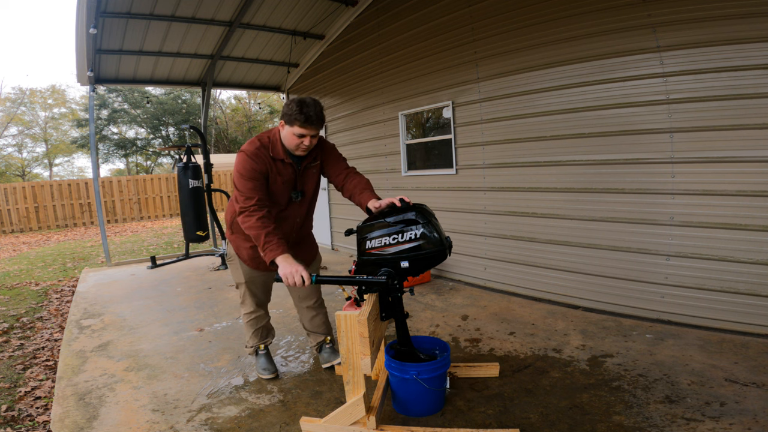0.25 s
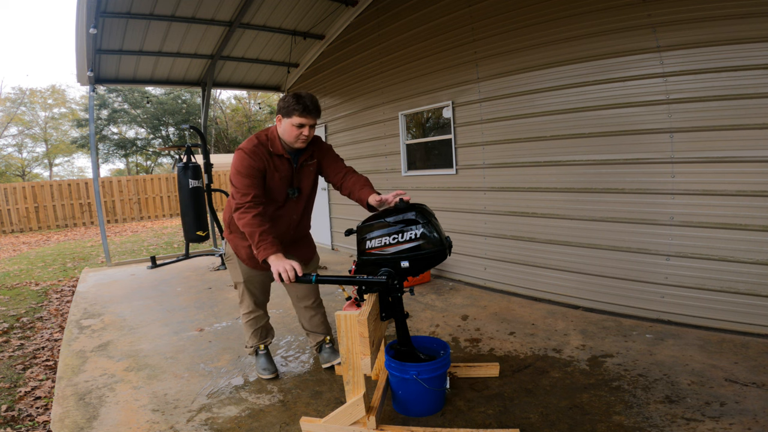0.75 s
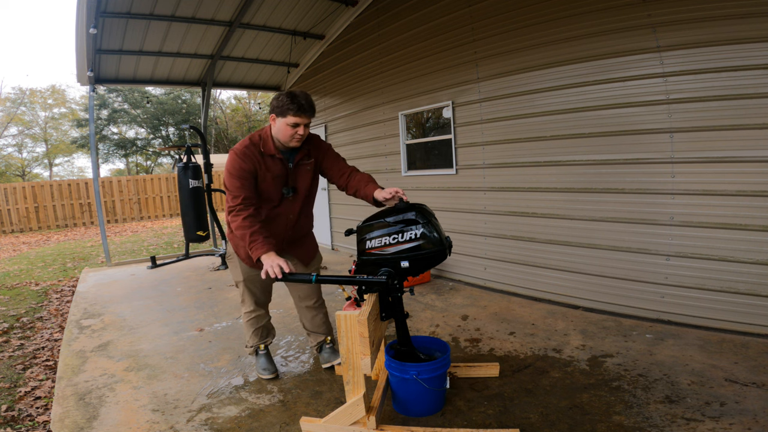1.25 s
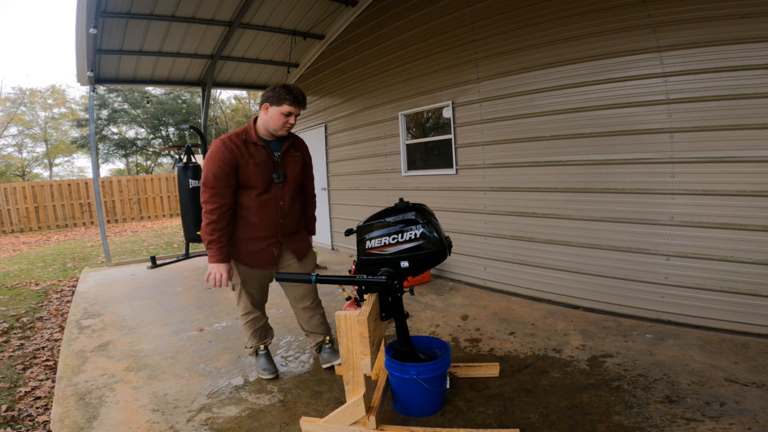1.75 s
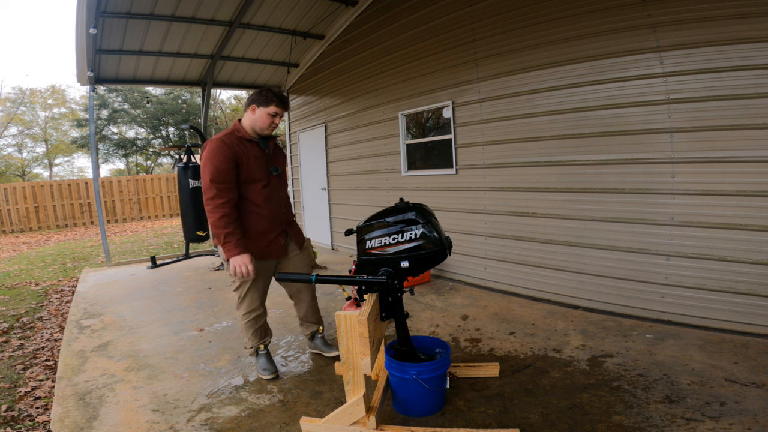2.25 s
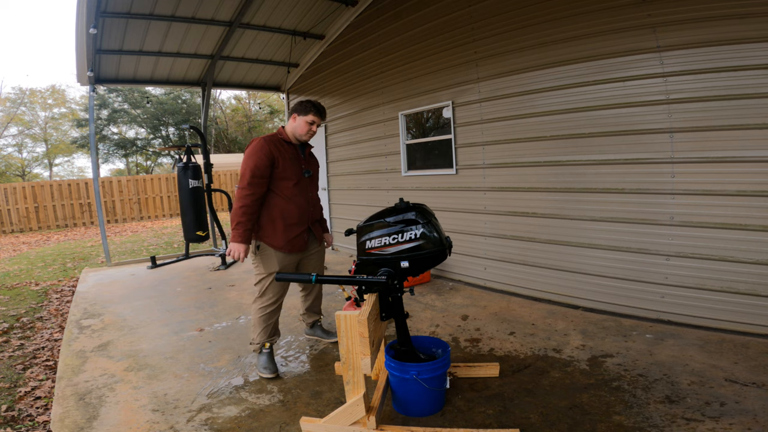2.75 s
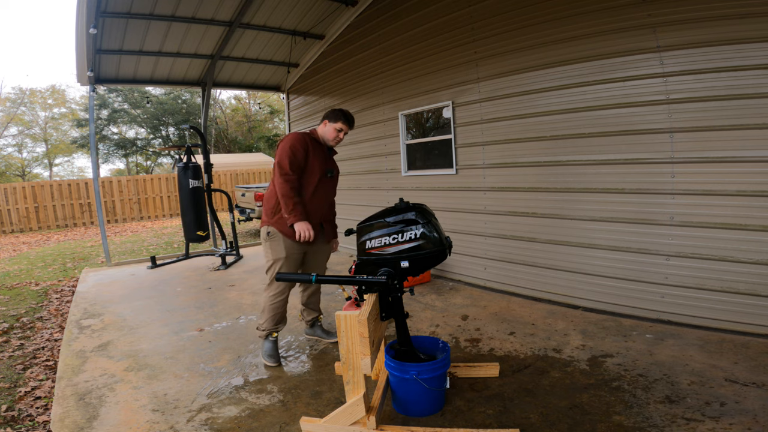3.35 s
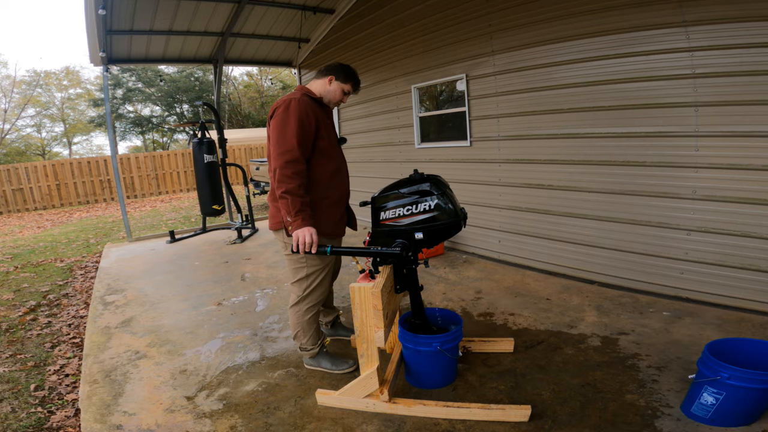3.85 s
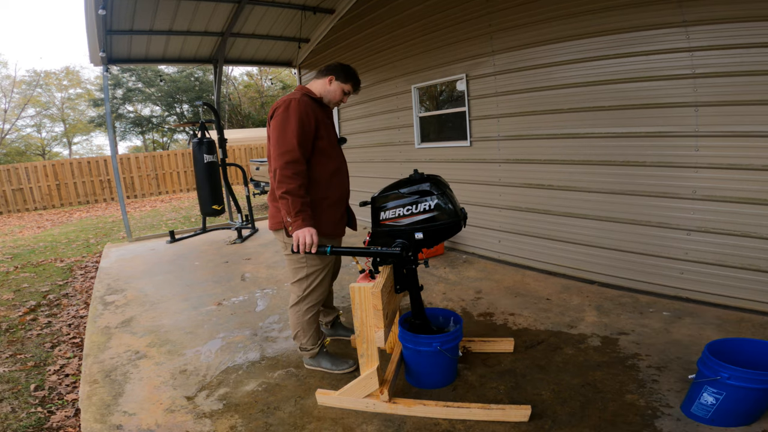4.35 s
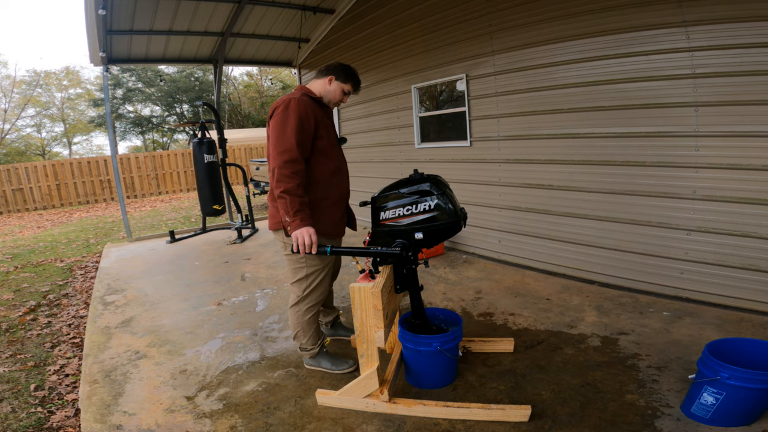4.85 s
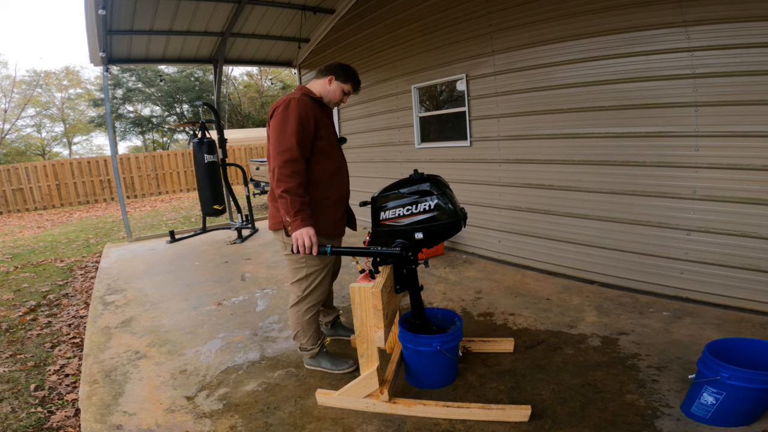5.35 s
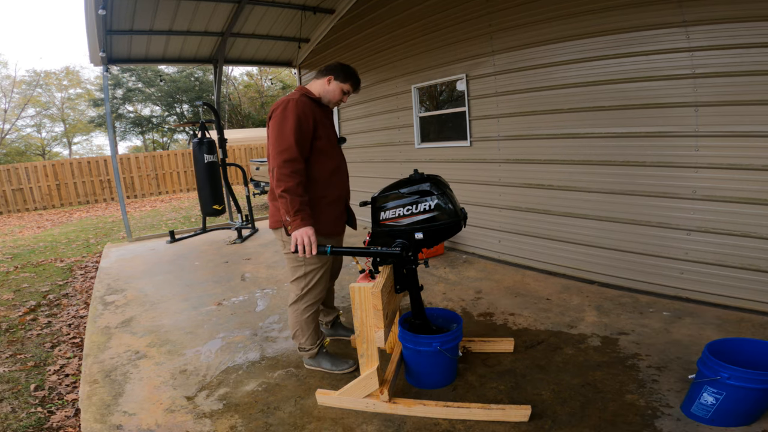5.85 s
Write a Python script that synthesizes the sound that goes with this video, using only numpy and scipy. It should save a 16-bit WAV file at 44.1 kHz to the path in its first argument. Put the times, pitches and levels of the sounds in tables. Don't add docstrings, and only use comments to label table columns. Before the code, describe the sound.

From 0 s a small outboard engine is already idling, its leg in a bucket of water under a carport. About eight or nine puffs a second, slightly uneven, each give a short low thump, a hollow wet burble and knocks that ring the bucket, with a light dry valve click on the engine cover. Large bubbles pop irregularly; a faint bracket hum grows around 1.3 s and fades by 1.6 s. From about 1.5 to 2 s fine spray begins to hiss, and from 3 to 3.9 s watery spits become sharp and frequent. At 3.9 s a hard cut: the right channel drops to almost nothing and the left carries a slightly faster idle, around nine to ten puffs a second, with weaker bucket knocks, more metallic ticking, simmering water and fan whine. Deep gulps cluster at 3.95-4.4 s, another near 4.95 s. Spray gradually thins and thumps soften until the end near 6.1 s, engine still running. Close microphone, short dull echoes.

```python
import sys
import numpy as np
from scipy import signal
from scipy.fft import rfft, irfft
from scipy.io import wavfile
from scipy.ndimage import uniform_filter1d

SR = 44100
rng = np.random.default_rng(int(sys.argv[2]) if len(sys.argv) > 2 else 0)


def master(y):
    cut = np.clip(np.atleast_2d(y).T, -1, 1)
    pcm = np.round(cut * 32767)
    wavfile.write(sys.argv[1], SR, pcm.astype(np.int16))


def invert_db(level):
    return 10 ** (np.asarray(level, dtype=float) / 20)


N = 269890
CUT_S = 3.9043


def by_idle(first, second):
    return np.where(np.arange(N) < CUT_S * SR, first, second)


def rms_one(x):
    return x / np.sqrt(np.mean(x ** 2) + 1e-20)


def add(track, s, piece):
    i = round(s * SR)
    piece = piece[max(-i, 0):max(N - i, 0)]
    track[max(i, 0):max(i, 0) + len(piece)] += piece


def band_pass(x, low_hz, high_hz):
    return signal.sosfilt(signal.butter(2, [low_hz, high_hz], "band", fs=SR, output="sos"), x)


def resonate(x, hz, width_hz):
    r = np.exp(-np.pi * width_hz / SR)
    top = (1 - r * r) / 2 * np.array([1, 0, -1])
    return signal.lfilter(top, [1, -2 * r * np.cos(2 * np.pi * hz / SR), r * r], x)


def resonate_twice(x, hz, width_hz):
    return resonate(resonate(x, hz, width_hz), hz, width_hz)


def body(x, idles):
    both = []
    for modes in idles:
        rings = [invert_db(db) * (-1) ** k * resonate(x, hz, width) for k, (hz, width, db) in enumerate(modes)]
        both.append(sum(rings))
    return by_idle(*both)


def swell(rise_ms, fall_ms):
    t_ms = np.arange(int(.12 * SR)) / SR * 1000
    shape = (1 - np.exp(-t_ms / rise_ms)) * np.exp(-t_ms / fall_ms)
    return shape / shape.max()


def grit(per_s, spread_db):
    sizes = invert_db(spread_db * np.minimum(rng.exponential(1, N), 4)) * rng.choice([-1, 1], N)
    return rms_one(sizes * (rng.random(N) < per_s / SR) + 1e-9)


def clumps(per_s, depth_db):
    knots = rng.standard_normal(int(N / SR * 60))
    return invert_db(depth_db * np.interp(np.arange(N) / SR * per_s, np.arange(len(knots)), knots))


def bubble(hz, cycles, rise):
    t = np.arange(int(.05 * SR)) / SR
    tone = np.sin(2 * np.pi * hz * (t + rise * t * t * hz / cycles))
    return tone * np.exp(-t * hz / cycles) * (1 - np.exp(-t * hz / 2.02))


def effort(cycles, rise_ms, fall_ms):
    flow = np.zeros(N)
    for s, _, lead_ms, db, _ in cycles:
        add(flow, s - lead_ms / 1000, invert_db(db) * swell(rise_ms, fall_ms))
    return flow


def carport(x):
    echoes = np.zeros(int(.06 * SR))
    delays_s = np.array([.007, .013, .021, .034, .047])
    echoes[(SR * delays_s).astype(int)] = invert_db(np.array([-20.0, -18, -10.5, -23.5, -65]))
    return x + signal.lfilter([.4], [1, -.6], signal.fftconvolve(x, echoes)[:N])


# t/s, level/dB
BRACKET_HUM = [
    (0, -59),
    (.6, -53.5),
    (1.3, -50),
    (1.6, -66.5),
    (6.12, -57),
]


def bracket():
    s, db = np.transpose(BRACKET_HUM)
    tone = resonate_twice(rng.standard_normal(N), 2078, 47)
    return invert_db(np.interp(np.arange(N) / SR, s, db)) * rms_one(tone)


DROPS_PER_S, DROP_DB = 45, [-27, -27]
DROP_LOW_HZ, DROP_HIGH_HZ = 1300, 15000


def drops():
    out = np.zeros(N)
    draws = rng.random((int(DROPS_PER_S * N / SR), 3))
    noises = rng.standard_normal((len(draws), int(.12 * SR)))
    for (when, size, pitch), noise in zip(draws, noises):
        hz = min(DROP_LOW_HZ * (DROP_HIGH_HZ / DROP_LOW_HZ) ** pitch, .45 * SR)
        hiss = resonate_twice(noise * swell(0.6, 6.0), hz, .25 * hz)
        add(out, when * N / SR, invert_db(-12.0 * size - 14.0 * pitch) * hiss)
    return by_idle(*invert_db(DROP_DB)) * out


# t/s, level/dB
MIST_LEVEL = [
    (0, -71),
    (1.5, -39),
    (2, -19),
    (2.5, -20.5),
    (3.201, -17),
    (3.9, -10.5),
    (3.91, -9.5),
    (6.12, -23),
]


def mist(cycles):
    s, db = np.transpose(MIST_LEVEL)
    patches = np.zeros(N)
    for hz, band_db in [(4600, 5.5), (7000, -2.5), (10000, 1.5), (14000, -9.0)]:
        hiss = rms_one(resonate(grit(per_s=4300, spread_db=10.0), hz, 0.32 * hz))
        patches += clumps(45, 2.9) * hiss * invert_db(band_db)
    return invert_db(np.interp(np.arange(N) / SR, s, db) - 6.5) * effort(cycles, 4.5, 35) * patches


WHINE_ORDER, WHINE_DB = 96.5, [-46, -39.5]


def whine(cycles):
    times = cycles[:, 0]
    speed = np.interp(np.arange(N) / SR, times[1:] - .05, 1 / np.diff(times))
    phase = 2 * np.pi * np.cumsum(WHINE_ORDER * uniform_filter1d(speed, size=9000)) / SR
    blur = np.exp(-2 * np.pi * 20 / SR)
    a, b = signal.lfilter([1], [1, -blur], rng.standard_normal((2, N)))
    tone = rms_one(a * np.sin(phase) + b * np.cos(phase))
    pulse = 0.54 + 0.63 * rms_one(effort(cycles, 5.6, 22))
    return by_idle(*invert_db(WHINE_DB)) * tone * pulse * clumps(11, 2.5)


# f/Hz, level/dB (per Hz)
CHURN_COLOUR = [
    [(30, -46), (150, -19), (300, -21.5), (650, -23.5), (1200, -28.5), (2300, -31.5), (4200, -42),
     (8200, -46.5), (15900, -51.5)],
    [(30, -29.5), (140, -19.5), (350, -11.5), (600, -40), (1300, -27.5), (2800, -27), (4200, -39.5),
     (9200, -43), (15900, -50)],
]
CHURN_DB = [-42, -39.5]


def churn(cycles):
    white, hz = rfft(rng.standard_normal(N)), np.linspace(1, SR / 2, N // 2 + 1)
    both = []
    for colour, level_db in zip(CHURN_COLOUR, CHURN_DB):
        at_hz, db = np.transpose(colour)
        shape = invert_db(np.interp(np.log(hz), np.log(at_hz), db, left=-70))
        both.append(invert_db(level_db) * rms_one(irfft(white * shape, N)))
    noise, flow = by_idle(*both), rms_one(effort(cycles, 9.8, 12))
    edges_hz = [20, 1200, 3500, 6500, 12800, 18000]
    signs = [1, -1, 1, -1, .75]
    patchy_db, flow_share = [.8, 1.2, 1.3, 1.6, 1.8], [0.67, 0.22, 0.35, 0.4, 0.3]
    out = np.zeros(N)
    for low, high, sign, depth_db, share in zip(edges_hz, edges_hz[1:], signs, patchy_db, flow_share):
        out += sign * band_pass(noise, low, high) * clumps(58, depth_db) * (1 + share * flow)
    return out


# t/s, level/dB (peak)
WALL_RING = [
    (1.3, -56),
    (1.7, -33.5),
    (2.7, -33),
    (3, -47),
    (3.85, -40),
]


def bucket_wall(cycles):
    s, db = np.transpose(WALL_RING)
    out, t = np.zeros(N), np.arange(int(.12 * SR)) / SR
    ring = swell(18, 36) * np.sin(2 * np.pi * 583 * t)
    for (at, *_), size in zip(cycles, rng.standard_normal(len(cycles))):
        add(out, at - .012, invert_db(np.interp(at, s, db, left=-70, right=-70) + 2 * size) * ring)
    return out


# t/s, level/dB, f/Hz
DEEP_GULPS = [
    (3.954, -21, 408),
    (4.045, -18, 414),
    (4.139, -21, 413),
    (4.229, -23.5, 428),
    (4.405, -27.5, 392),
    (4.945, -24.5, 370),
]


def gurgle(cycles):
    out = np.zeros(N)
    for (s, *_), (late, size, pitch) in zip(cycles, rng.random((len(cycles), 3))):
        add(out, s - .015 + 0.044 * late, invert_db(-27.5 - 5.9 * size) * bubble(300 + 160 * pitch, 3.05, 0.03))
    for s, db, hz in DEEP_GULPS:
        add(out, s, invert_db(db) * bubble(hz, 6.0, 0.0088))
    push = rms_one(band_pass(rng.standard_normal(N), 45, 150))
    return out + invert_db(-19.0) * push * effort(cycles, 16, 24) * clumps(12.0, 0.65)


# f/Hz, width/Hz, level/dB
BUCKET_RINGS = [
    [(337.6, 42, -1), (432, 37, 2.5), (574, 25.6, -1), (758, 52, 3), (850, 60, 3), (1000, 89, -1.5),
     (1270, 580, -12.5)],
    [(362, 62, -8), (486, 290, -9), (682, 105, -6.5), (903, 60, -3.5), (1100, 200, -13.5), (1390, 21, -22)],
]
KNOCK_DB, KNOCK_LAG_MS = [9.5, -10], [8.02, 17]


def knocks(cycles):
    out, luck = np.zeros(N), rng.standard_normal((len(cycles), 2, 8))
    for (s, _, lead_ms, db, _), blows in zip(cycles, luck):
        idle = int(s > CUT_S)
        for lag_ms, sizes in zip(KNOCK_LAG_MS, blows):
            for (hz, width, mode_db), size in zip(BUCKET_RINGS[idle], sizes):
                gain = invert_db(db + mode_db + KNOCK_DB[idle] - 17.5 + 2.8 * size)
                add(out, s + (lag_ms - lead_ms) / 1000, gain * bubble(hz, min(0.42 * hz / width, 9), 0))
    return out


def spray(spits):
    gate, out = np.zeros(N), np.zeros(N)
    for (s, db, hz), draws in zip(spits, rng.random((len(spits), 5, 3))):
        add(gate, s - .012, invert_db(db) * np.hanning(int(0.019 * SR)))
        for k, (late, size, pitch) in enumerate(draws - .5):
            gain = invert_db(db - 4 - 5.0 * abs(k - 2) + 0.81 * size)
            small = bubble(hz * (.74 + 0.075 * k + .15 * pitch), 7.2, 0.0377)
            add(out, s - .008 + 0.0042 * (k + late), gain * small)
    droplets = band_pass(grit(per_s=9000, spread_db=-4.0), 1200, 3800)
    return out + invert_db(-16.5) * gate * rms_one(droplets)


# f/Hz, width/Hz, level/dB
COVER_RINGS = [
    [(936, 195, 7), (2020, 11, -6), (2620, 240, 5), (3370, 68, 3.5), (5050, 180, -1), (5700, 3600, -8),
     (8100, 1530, -2.5), (10600, 2000, -14), (14400, 2500, -18)],
    [(950, 104, 11), (2140, 41, 10.5), (2440, 540, 6.5), (3090, 710, 3.5), (4560, 130, 3.5),
     (5670, 300, -1.5), (9200, 1360, -6.5), (14500, 2100, -16)],
]
# share of the cycle, level/dB under the click (first idle, second idle), f/Hz
GEAR_TAPS = [
    (0.037, -13, -7, 5230),
    (.19, -44, -10, 5700),
    (0.311, -21, -8, 4480),
    (0.551, -9.5, -17.5, 2720),
    (0.802, -19, -16, 5700),
]
# f/Hz, cycles of ring, level/dB over the click
ROCKER_RING = [
    (2660, 9.6, 0),
    (2850, 4.9, 6),
]
# t/s, level/dB (peak), f/Hz
STRAY_TICKS = [(0.2245, -43, 7900), (0.46, -45, 7500), (0.6714, -38, 3740), (0.6938, -55, 3400),
               (0.9168, -44, 9550), (1.3982, -45, 8240), (1.6352, -44, 3600), (1.728, -40, 5750),
               (2.0727, -41, 5650), (2.1814, -41, 5830), (2.536, -34.5, 4430), (2.6409, -41, 3850),
               (3.614, -35.5, 7400), (3.8167, -34.5, 4740)]
RATTLE_DB = [-48.5, -48.5]


def valves(cycles):
    gate, ticks = np.zeros(N), np.zeros(N)
    chance = rng.standard_normal((len(cycles), len(GEAR_TAPS), 2))
    for (s, db, *_), gap, luck in zip(cycles, np.gradient(cycles[:, 0]), chance):
        idle = int(s > CUT_S)
        add(gate, s, invert_db(db) * (swell(0.049, 0.62) + invert_db(-12.5) * swell(0.85, 11.2)))
        ring_hz, turns, ring_db = ROCKER_RING[idle]
        add(ticks, s, invert_db(db + ring_db) * bubble(ring_hz, turns, 0))
        for (share, *under_db, hz), (size, pitch) in zip(GEAR_TAPS, luck):
            gain = invert_db(db + under_db[idle] + 1.6 * size)
            add(gate, s + share * gap, gain * swell(0.028, 0.32))
            ring = invert_db(-3.0 + 1.8 * idle) * bubble(hz * (1 + .02 * pitch), 12.0, 0)
            add(ticks, s + share * gap, gain * ring)
    noises = rng.standard_normal((len(STRAY_TICKS), int(.12 * SR)))
    for (s, db, hz), noise in zip(STRAY_TICKS, noises):
        add(ticks, s, invert_db(db + 14) * resonate_twice(noise * swell(0.54, 3.1), hz, 0.39 * hz))
    clicks = invert_db(11.5) * body(gate * rng.standard_normal(N), COVER_RINGS)
    dull = signal.butter(2, 3600, fs=SR, output="sos")
    soft = signal.sosfilt(dull, grit(per_s=500, spread_db=5.5))
    rattle = rms_one(body(soft * clumps(35, 2.5), COVER_RINGS))
    return clicks + ticks + by_idle(*invert_db(RATTLE_DB)) * rattle


# t/s, level/dB (peak), f/Hz
STRAY_BUBBLES = [(0.065, -11.5, 865), (0.122, -8, 860), (0.19, -16, 980), (0.229, -4.5, 881),
                 (0.436, -6.5, 840), (0.585, -6.5, 844), (0.664, -19, 920), (0.714, -8.5, 870),
                 (0.913, -15.5, 1000), (1.257, -13, 1056), (1.392, -19, 940), (1.421, -9, 940),
                 (1.494, -14.5, 980), (1.721, -12, 970), (1.981, -11, 874), (2.429, -6, 847),
                 (2.743, -15, 924), (2.767, -14, 756), (2.988, -6.5, 840)]
SIMMER_DB = [-46, -35.5]


def burble(cycles):
    rattle = rms_one(body(grit(per_s=600, spread_db=4.0) * clumps(30, 1.5), BUCKET_RINGS))
    out = rattle * (invert_db(-2.0) * effort(cycles, 13.7, 8.3) + by_idle(*invert_db(SIMMER_DB)))
    chance = rng.random((len(cycles), 4, 3))
    for (s, _, lead_ms, db, hz), draws in zip(cycles, chance):
        for k, (late, size, pitch) in enumerate(draws):
            at = s - lead_ms / 1000 + .011 * k * (.6 + 1.3 * late)
            add(out, at, invert_db(db + 6.0 - 12.0 * size) * bubble(hz * (.72 + .5 * pitch), 8.7, 0.012))
    for s, db, hz in STRAY_BUBBLES:
        pair = bubble(hz * .95, 5.38, 0.0545) + 0.38 * bubble(hz * 1.4, 4.0, 0.103)
        add(out, s - .001, invert_db(db - 6.0) * pair)
    return out


HUM_DB = [-37.5, -38]


def thumps(cycles, pockets):
    out, t = np.zeros(N), np.arange(-2600, 2600) / SR
    phases = 2 * np.pi * rng.random((len(pockets), 2))
    gaps = np.gradient(cycles[:, 0])
    for (s, db, hz, spread_ms, intake_db), gap, (main, weak) in zip(pockets, gaps, phases):
        width_s = spread_ms / 1000 * np.where(t < 0, 1.2, 1.6)
        thump = np.exp(-.5 * (t / width_s) ** 2) * np.sin(2 * np.pi * hz * t + main)
        add(out, s - .002 + t[0], invert_db(db) * thump)
        intake = np.exp(-.5 * (t / 0.012) ** 2) * np.sin(2 * np.pi * 0.854 * hz * t + weak)
        add(out, s + .52 * gap + t[0], invert_db(intake_db - 17.0) * intake)
    hum = resonate_twice(rng.standard_normal(N), 225.0, 79)
    return out + by_idle(*invert_db(HUM_DB)) * rms_one(hum)


# t/s, cycles completed (a valve click at each whole one)
CRANK_TURNS = [(0.0044, 0), (0.3078, 2.45), (0.605, 5), (0.9683, 8), (1.196, 10), (1.4306, 12),
               (1.8845, 16), (1.9948, 17), (2.3405, 20), (2.4483, 21), (3.111, 27), (3.326, 29),
               (3.8512, 34), (3.9459, 35), (4.0344, 36), (4.8612, 45), (5.2997, 49.49), (6.0946, 57)]
# t/s, gas pocket level/dB, its lag behind the click/ms, intake level/dB, click level/dB
ENGINE_LOAD = [
    (0, -20.5, -1.5, -26.5, -25),
    (1.5, -17, -3, -18, -27),
    (2.2, -18, 6.5, -55, -31.5),
    (2.95, -17.5, 6, -30, -29),
    (3.4, -17, 7, -54, -30.5),
    (3.9, -21.5, 9.5, -52, -29),
    (3.91, -19.5, 1, -26, -30),
    (4.8, -19, 4.5, -18, -29),
    (5.3, -22.5, 1.5, -26, -29),
    (6.12, -23.5, 2.5, -39, -29.5),
]
# t/s of the valve click, exhaust lead/ms, level/dB over the usual
ODD_PUFFS = [(.004, 5.7, 1.7), (.128, 15, 3.3), (.252, 30, 3.8), (.489, 6, 1.3), (.847, 27, 2.5),
             (.968, 14, -1), (1.082, 15.6, 0.5), (1.196, 31.7, 3), (1.431, 24.4, 0.5), (1.543, 23.6, 0.5),
             (1.657, 27.8, -.3), (1.995, 17, 0.5), (2.226, 19.7, -2.5), (2.34, 22, -1), (2.448, 28.8, 3),
             (2.668, 30.4, -7), (2.779, 20.3, 0.9), (3.326, 19.3, -3), (3.431, 24, 0), (3.537, 17, -2.5),
             (3.64, 25, 4), (3.747, 22.7, 1), (3.851, 18.7, 2.5), (3.946, 21, 4.5), (4.034, 22, -3.5),
             (4.126, 21, -8), (4.402, 21, 3), (4.768, 23.4, 2.5), (5.252, 17, -3.7), (5.67, 19, -2)]
# t/s, level/dB, f/Hz
LARGE_SPITS = [(0.479, -28, 2420), (0.714, -25, 2150), (0.962, -32, 2560), (1.072, -30, 2920),
               (1.532, -25, 2700), (2.189, -24.5, 2050), (2.537, -24, 3550), (2.644, -33, 2780),
               (2.759, -23, 2420), (2.978, -18, 2750), (3.099, -22, 2030), (3.199, -20, 2120),
               (3.311, -14.5, 2660), (3.416, -24, 2720), (3.522, -13, 2460), (3.626, -19, 2660),
               (3.73, -17.5, 2710), (3.835, -17, 2290), (3.921, -23, 2650), (4.1, -29, 2550),
               (4.199, -26, 2680)]
LEAD_MS, LEAD_SCATTER_MS, PUFF_SCATTER_DB, CLICK_SCATTER_DB = 23.5, 2.425, -0.76, 0.32
POCKET_HZ, BURBLE_HZ, BURBLE_UNDER_DB = [238.3, 224], [826.6, 943], [-10, -15]
SPIT_DB, SPIT_HZ, SPIT_AHEAD_MS = [-46.5, -39], [2550, 2830], [12, 18]
BURBLE_DB_PER_MS, LAG_PER_MS, INTAKE_DB_PER_MS = 0.1443, -0.28, -.6
SPREAD_MS, SPREAD_MS_PER_DB, LAG_MS_PER_DB = 9.33, -0.57, 0.2


def engine():
    crank_s, turned = np.transpose(CRANK_TURNS)
    s = np.interp(np.arange(turned[-1] + 1), turned, crank_s)
    load_s, *states = np.transpose(ENGINE_LOAD)
    pocket_db, lag_ms, intake_db, click_db = [np.interp(s, load_s, state) for state in states]
    pairs = np.array([POCKET_HZ, BURBLE_HZ, BURBLE_UNDER_DB, SPIT_DB, SPIT_HZ, SPIT_AHEAD_MS])
    pocket_hz, burble_hz, under_db, spit_db, spit_hz, ahead_ms = pairs[:, (s > CUT_S).astype(int)]
    luck = rng.standard_normal((len(s), 10)).T

    lead_ms, over_db = LEAD_MS + LEAD_SCATTER_MS * luck[0], PUFF_SCATTER_DB * luck[1]
    for at, ms, db in ODD_PUFFS:
        k = np.argmin(np.abs(s - at))
        lead_ms[k], over_db[k] = ms, db
    early_ms = lead_ms - LEAD_MS

    burble_db = pocket_db + under_db + BURBLE_DB_PER_MS * early_ms + 0.35 * over_db + 0.4 * luck[2]
    click_db = click_db + CLICK_SCATTER_DB * luck[3]
    cycles = np.transpose([s, click_db, lead_ms, burble_db, burble_hz * (1 + 0.059 * luck[4])])

    pocket_s = s + (lag_ms + LAG_PER_MS * early_ms + LAG_MS_PER_DB * over_db) / 1000
    pocket_hz = pocket_hz * (1 + 0.0083 * luck[5])
    spread_ms = np.clip(SPREAD_MS + SPREAD_MS_PER_DB * over_db + 0.84 * luck[6], 4, 15)
    intake_db = intake_db + INTAKE_DB_PER_MS * np.clip(early_ms, -9, 9) + 4.0 * luck[7]
    pockets = np.transpose([pocket_s, pocket_db + over_db, pocket_hz, spread_ms, intake_db])

    spit_db, spit_hz = spit_db + 3.5 * luck[8], spit_hz * (1 + 0.073 * luck[9])
    spits = np.transpose([s - ahead_ms / 1000, spit_db, spit_hz])
    for row in LARGE_SPITS:
        spits[np.argmin(np.abs(spits[:, 0] - row[0]))] = row
    return cycles, pockets, spits


def scene():
    cycles, pockets, spits = engine()
    near = churn(cycles) + whine(cycles) + bucket_wall(cycles) + gurgle(cycles) + thumps(cycles, pockets)
    echoing = bracket() + drops() + mist(cycles) + knocks(cycles) + spray(spits) + valves(cycles) + burble(cycles)
    mono = near + carport(echoing)
    return np.array([mono, mono])


def roll_off(x):
    return signal.sosfilt(signal.butter(12, 15920, fs=SR, output="sos"), x)


def record(dry):
    hiss = invert_db(-109) * signal.lfilter([1], [1, -.98], rng.standard_normal(N))
    treble = signal.butter(2, 2000, "high", fs=SR, output="sos")
    bright = signal.sosfilt(treble, rng.standard_normal(N))
    apart = invert_db(-72.5) * clumps(30.06, 8.1) * bright + invert_db(16) * hiss
    near_cut = np.exp(-np.abs(np.arange(N) / SR - CUT_S) / 0.0099)
    fading = invert_db(-48) * near_cut * resonate(rng.standard_normal(N), 800, 1500)
    left = dry[0] + by_idle(apart, 0)
    right = by_idle(dry[1] - apart, hiss + fading)
    top_cut = signal.cheby2(20, 60, 16050, fs=SR, output="sos")
    mix = signal.sosfilt(top_cut, [left, right])
    return roll_off(mix)


dry = scene()
out = record(dry)
master(out)
```